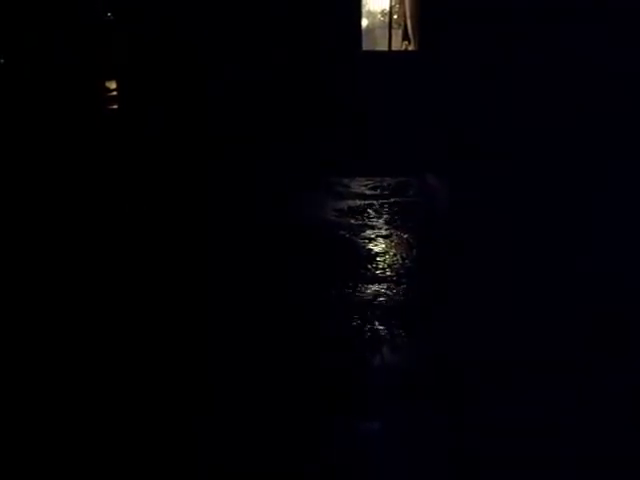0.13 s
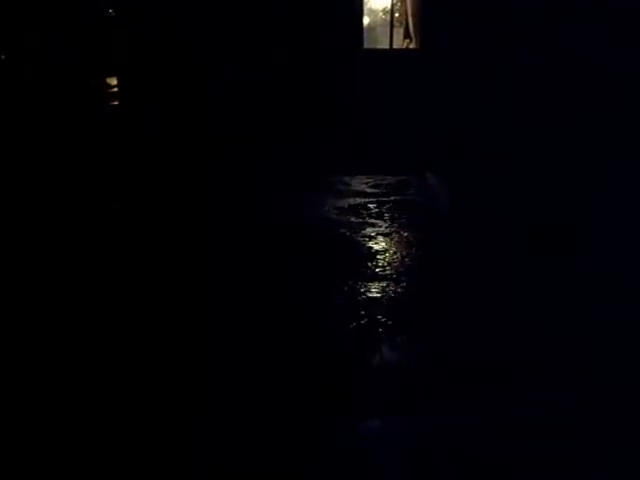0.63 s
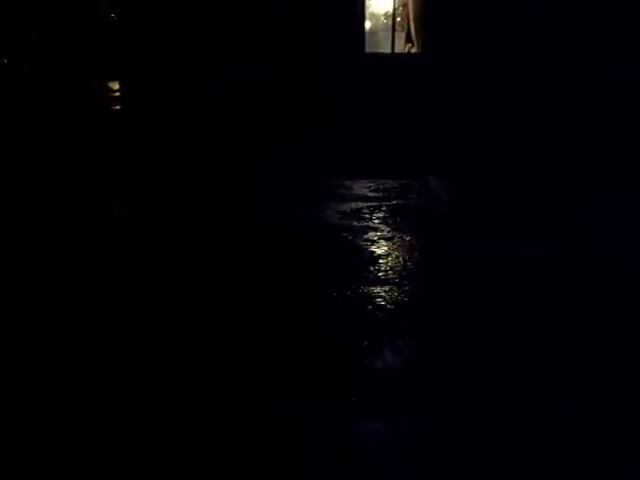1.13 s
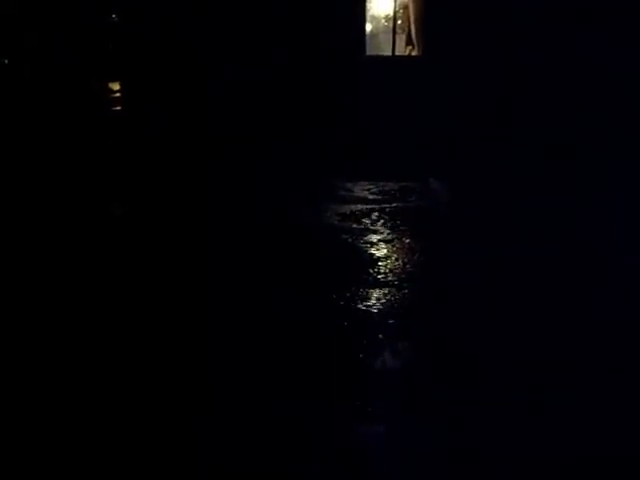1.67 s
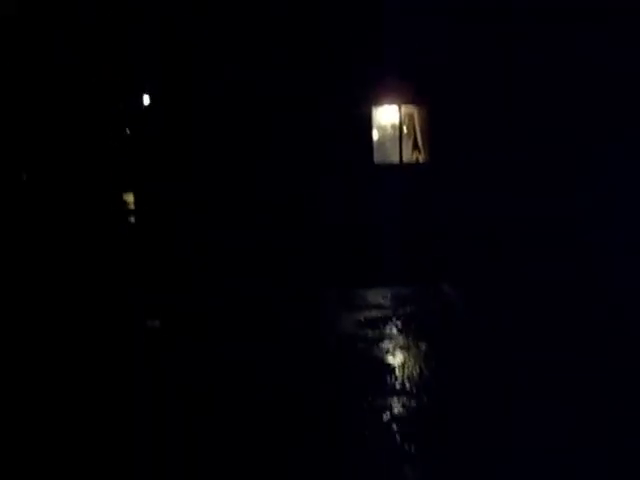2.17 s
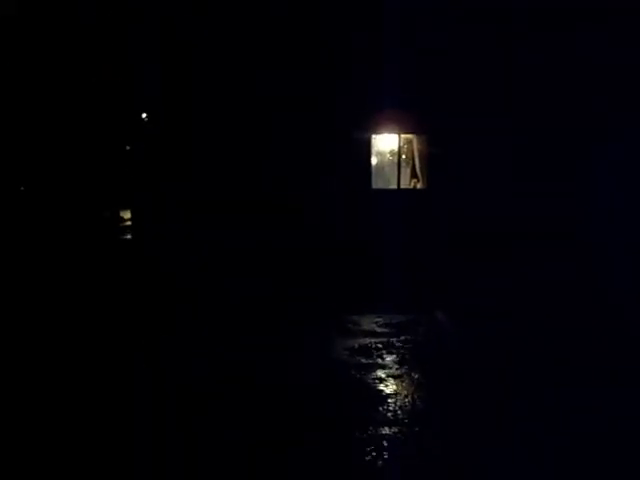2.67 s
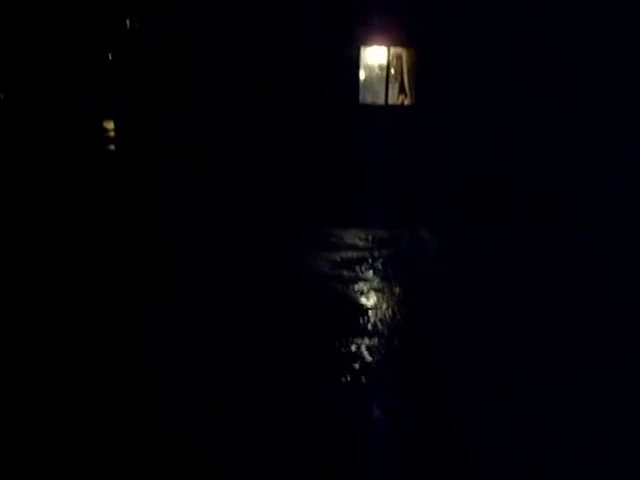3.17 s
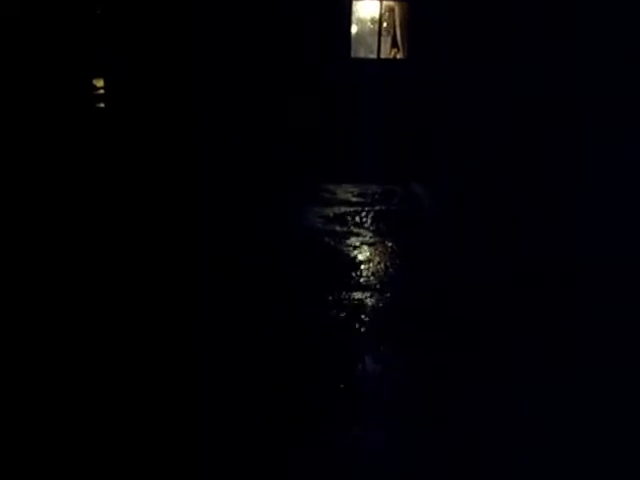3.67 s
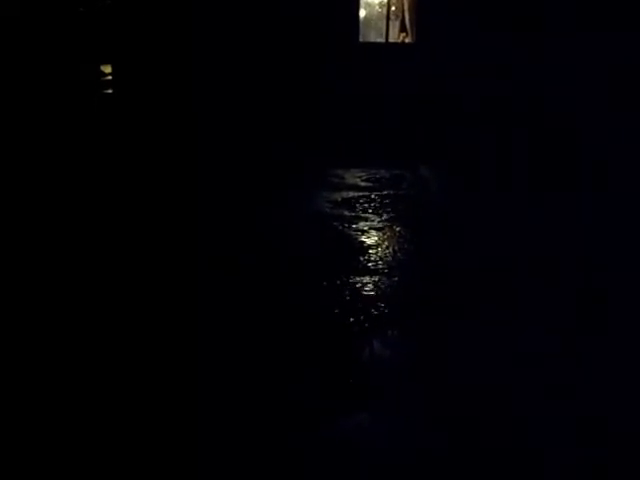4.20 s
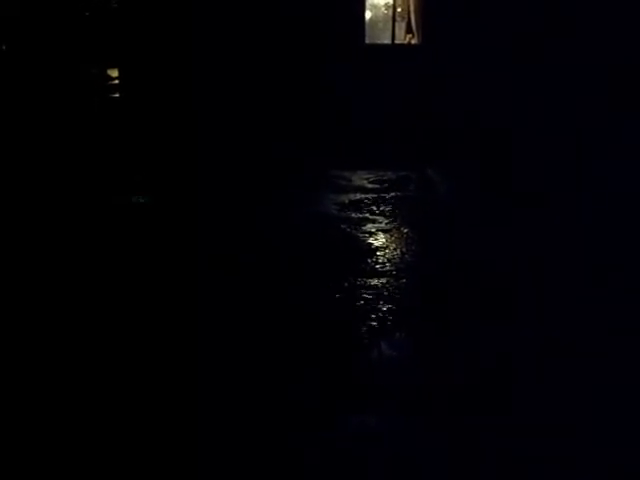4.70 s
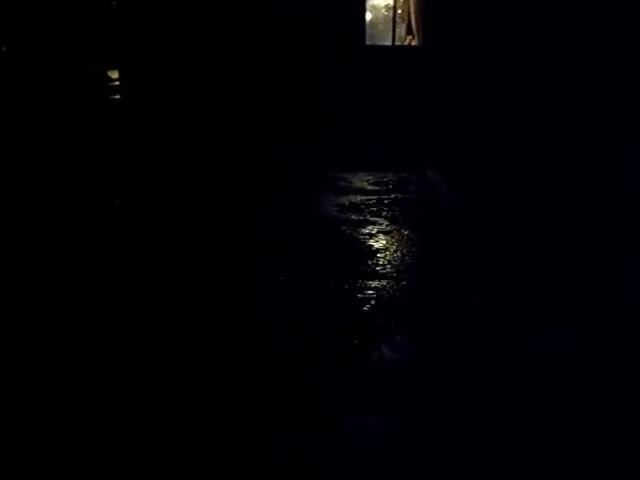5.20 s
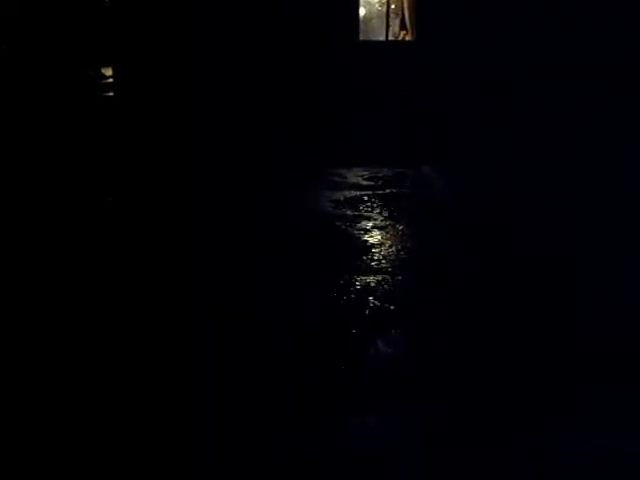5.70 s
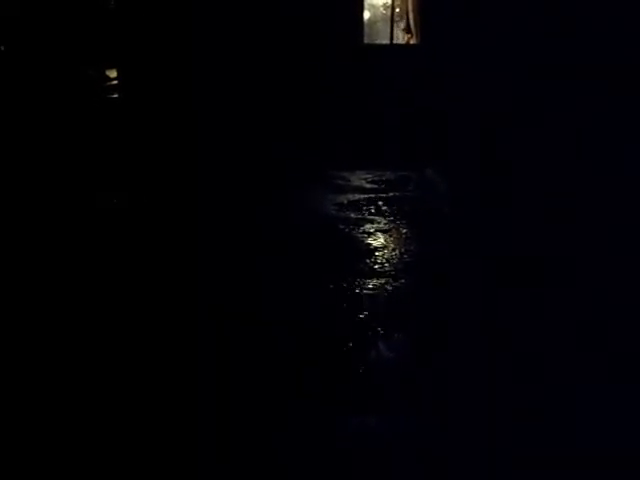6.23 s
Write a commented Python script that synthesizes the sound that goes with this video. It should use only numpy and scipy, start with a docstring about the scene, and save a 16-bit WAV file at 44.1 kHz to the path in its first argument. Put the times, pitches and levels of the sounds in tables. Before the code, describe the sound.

Sparse close raindrops click and spatter irregularly, with nearby walls giving them short reflections. Behind them are finer patter, hushed far rain and a very faint low drone. After almost four seconds of this, thunder arrives, builds in lumps to much louder heavy blows, and rolls on, weakening but not gone at the end. The small microphone sounds thin and hissy, with drops still audible through the thunder.

```python
"""Wet pavement at night in light rain: near ticks and splashes, middle and far drops, a few puddle plinks.
Drops are short damped sine bursts with decaying spatter; the far wash is noise with drifting patches. Thunder
begins just before four seconds: filtered shocks over diffuse noise, swelling in lumps and then fading, with low
blows within it. Far off are a wavering low drone and a thin hum in spells. A small microphone hears it behind a
resonant port; a steady hiss, a thin whine and noise that follows the local level join in."""
import sys
import numpy as np
from scipy import signal
from scipy.fft import rfft, irfft, next_fast_len
from scipy.io import wavfile
from scipy.ndimage import uniform_filter1d

SR = 44100
rng = np.random.default_rng(int(sys.argv[2]) if len(sys.argv) > 2 else 0)


def voltage_ratio(level):
    """Linear amplitude factor for a level in decibels (scalar or array-like)."""
    return 10 ** (np.asarray(level, float) / 20)


def log_audio(samples):
    """Write samples as a 16-bit WAV file to the path given in sys.argv[1]."""
    # one column per channel
    frames = np.atleast_2d(samples).T
    # limit to full scale, then quantise
    limited = np.clip(frames, -1, 1)
    pcm = np.round(limited * 32767).astype(np.int16)
    wavfile.write(sys.argv[1], SR, pcm)


N = 280035  # length in samples


def evened(x):
    """Normalizes mean power: scales to rms 1."""
    return x / np.sqrt(np.mean(x ** 2) + 1e-20)


def read(points, hz):
    """Interpolates a spectrum on a logarithmic frequency axis."""
    point_hz, value = np.transpose(points)
    return np.interp(np.log(hz + 1), np.log(point_hz + 1), value)


def add(mix, s, sound):
    """Superposition: adds a sound into the mix, in place, from time s."""
    part = mix[round(s * SR):][:len(sound)]
    part += sound[:len(part)]


def coloured(x, gain):
    """Linear filtering: multiplies the spectrum by a gain that is a function of frequency."""
    size = next_fast_len(len(x) + 4096)
    return irfft(rfft(x, size) * gain(np.fft.rfftfreq(size, 1 / SR)), size)[:len(x)]


def port(x):
    """Helmholtz resonance: air in the microphone port is a mass on a spring, a peak and then a fall."""
    port_hz, port_q = 3156, 7.5
    return coloured(x, lambda hz: 1 / (1 - (hz / port_hz) ** 2 + 1j * hz / port_hz / port_q))


def tick(hz, cycles):
    """Damped oscillation: a sine burst that swells and dies within some cycles, peak 1 behind the port."""
    turns = np.arange(round(8 * cycles * SR / hz)) * hz / SR
    envelope = (turns / cycles) ** 1.5 * np.exp(-2 * turns / cycles)
    burst = np.sin(2 * np.pi * turns) * envelope
    tail = np.exp(-turns)
    burst -= burst.sum() * tail / tail.sum()  # an impact leaves no lasting pressure
    return burst / abs(port(burst)).max()


def train(per_s, spread_db):
    """Poisson-like shot noise: random clicks of either sign, a few much larger."""
    hit, size, sign = rng.random(N), rng.exponential(1, N), rng.choice([-1., 1.], N)
    return (hit < per_s / SR) * sign * voltage_ratio(spread_db * np.minimum(size, 3.3))


def echoed(x):
    """Early reflection: nearby walls repeat a sound within milliseconds, with the treble dulled."""
    # first reflections from the walls: delay_s, level_db
    walls = [(.0038, -8), (.0078, -11), (.0125, -15), (.021, -18)]
    out = x.copy()
    dull = coloured(x, lambda hz: 1 / (1 + (hz / 5000) ** 4))
    for delay_s, level_db in walls:
        add(out, delay_s, voltage_ratio(level_db) * dull)
    return out


def drops():
    """Impact and spray: each near drop is a tick with a sharp edge and a thud, then a spatter of droplets."""
    # near drops: peak_s, peak_db (of the part that suits the tone, behind the port),
    # tone (-1 dull thud, 0 tick, 1 sharp edge; clipped there), spatter_db (rms before rise and decay)
    near_drops = [(0.0224, -48, 1.1, -65), (0.2096, -47, -0.7, -54.5), (0.234, -42, 0.87, -56),
                  (0.29, -37.5, 0.54, -53), (0.337, -47, .05, -58), (0.4505, -50, .05, -67),
                  (0.5101, -36, -0.72, -52.5), (0.597, -47, .05, -65), (0.7394, -47, .1, -63),
                  (0.885, -37, 0.58, -54), (0.914, -39, .05, -63), (0.975, -47, -0.77, -58.5),
                  (1.0486, -51, -.4, -67), (1.0825, -54, 0.95, -70), (1.268, -52, .6, -61),
                  (1.341, -51, -1, -59), (1.3984, -48, 1.0, -59), (1.403, -49, 1.2, -68),
                  (1.435, -48, .5, -64), (1.5058, -34, 0.5, -50), (1.5306, -46, -.3, -70),
                  (1.569, -53, .6, -58), (1.606, -51, .4, -75), (1.636, -41, -0.77, -60),
                  (1.6755, -46, -0.76, -69), (1.9608, -37.5, .1, -58), (2.0044, -55, 0.52, -75),
                  (2.0617, -42.5, 1.2, -69), (2.0846, -51, .4, -66), (2.1477, -40.5, .05, -50.5),
                  (2.2094, -50, .1, -60), (2.2245, -46.5, .1, -68), (2.307, -48, -0.67, -73),
                  (2.442, -41, 0.77, -51.5), (2.543, -47, .8, -58), (2.566, -46, .2, -54.5),
                  (2.6706, -57, 0.77, -75), (2.817, -31, .65, -47), (2.9285, -50, .1, -55.5),
                  (3.0117, -54, .05, -69), (3.114, -50, .05, -70), (3.248, -40.5, 0.94, -61),
                  (3.2666, -38.5, .05, -68), (3.3347, -45, .2, -61), (3.353, -52, 1, -66),
                  (3.382, -51, .5, -65), (3.4097, -42, -0.57, -56), (3.439, -49, .95, -72),
                  (3.4628, -45, -0.78, -59), (3.4795, -48, .05, -72), (3.5634, -45, -0.57, -53),
                  (3.7407, -46, -0.31, -62), (3.901, -52, 1, -75), (3.9369, -48, -.5, -73),
                  (4.133, -42, .05, -54), (4.1922, -42.5, -.3, -57), (4.383, -42, .05, -72),
                  (4.5054, -50, .1, -56), (4.588, -44, .5, -53), (4.8016, -29, 0.49, -47.5),
                  (4.8656, -41, .1, -52), (5.3147, -44, 0.14, -66), (5.4567, -45, 0.86, -53.5),
                  (5.518, -42.5, .05, -62), (5.5563, -46, .95, -58), (5.845, -52, .3, -54),
                  (5.9538, -41, 0.51, -53), (6.015, -45, .05, -57), (6.09, -45, -0.51, -74)]
    # how far each part sinks when the tone is not its own
    tick_loss_db, edge_loss_db, thud_loss_db = 13, 22, 18
    spatter_rise_s, spatter_t60_s = 0.0023, .065
    out, t = np.zeros(N), np.arange(3500) / SR
    detune = rng.uniform(.9, 1.1, (len(near_drops), 3))
    droplets = rng.standard_normal((len(near_drops), len(t)))
    droplets = droplets * abs(droplets)  # uneven sizes
    spatter_shape = voltage_ratio(-60 * t / spatter_t60_s) * np.minimum(t / spatter_rise_s, 1)
    for (peak_s, peak_db, tone, spatter_db), (a, b, c), spray in zip(near_drops, detune, droplets):
        body = tick(3500 * a, 1.0)
        spatter = np.convolve(spray, body)[:len(t)]
        drop = voltage_ratio(spatter_db) * spatter_shape * spatter / port(spatter).std()
        sharp, dull = np.clip(tone, 0, 1), np.clip(-tone, 0, 1)
        add(drop, 0, voltage_ratio(peak_db - tick_loss_db * (sharp + dull) ** 4) * body)
        add(drop, .0002, voltage_ratio(peak_db - edge_loss_db * (1 - sharp)) * tick(6600 * b, .9))
        add(drop, 0, voltage_ratio(peak_db - thud_loss_db * (1 - dull)) * tick(1800 * c, 1.0))
        add(out, peak_s - .0005, drop)
    return echoed(out)


def thunder():
    """Extended source: shocks from each kink of the lightning channel arrive scattered over diffuse echoes."""
    # loudness of the roll before its deep end and treble are weighted: time_s, level_db
    roll_levels = [(3.92, -56), (3.94, -54.5), (3.99, -56), (4.09, -48), (4.12, -52.5), (4.23, -41),
                   (4.37, -44), (4.52, -42), (4.61, -37.5), (4.66, -32.5), (4.7, -37.5), (5.17, -35),
                   (5.21, -38), (5.32, -39.5), (5.37, -42), (5.5, -42), (5.53, -36.5), (5.61, -42),
                   (5.75, -43.5), (5.78, -41), (5.86, -45.5), (5.94, -41), (6.35, -46)]
    # relative spectrum of the thunder in the air: freq_hz, density_db
    air_colour = [(20, -8), (50, -15), (90, -2), (140, 1), (220, 0.5), (450, -1), (900, -6), (1300, -11.5),
                  (1800, -21), (2600, -34.5), (3400, -52), (4500, -62.5), (7000, -58)]
    front_s = 3.921
    boom_start_db, boom_drift_db_per_s = -5, 1.2
    # later sound comes from farther up the channel and has lost more treble
    crackle_start_db, crackle_drift_db_per_s, crackle_least_db = 11, -6, 0
    # the first arrivals graze the ground and lack the top of the crackle
    muffled_db, muffled_hz, opening_s = -12, 1750, .24
    since = np.arange(N) / SR - front_s
    level_db = np.interp(since + front_s, *np.transpose(roll_levels))
    boom_db = boom_start_db + boom_drift_db_per_s * since
    crackle_db = np.maximum(crackle_start_db + crackle_drift_db_per_s * since, crackle_least_db)
    muffle_db = muffled_db * np.clip(1 - (since / opening_s) ** 4, 0, 1)

    echoes = np.clip(0.71 + 0.81 * since, 0, 2.2)  # the diffuse echoes build up after the first arrivals
    shocks = evened(train(per_s=1200, spread_db=3.5)) + echoes * rng.standard_normal(N)
    shocks = shocks / np.sqrt(1 + echoes ** 2)
    # kinks come in clumps
    lumps = evened(coloured(rng.standard_normal(N), lambda hz: 1 / (1 + (hz / 30) ** 2)))
    air = evened(coloured(shocks * voltage_ratio(1.1 * lumps), lambda hz: voltage_ratio(read(air_colour, hz))))

    boom = coloured(air, lambda hz: 1 / (1 + (hz / 170) ** 4))
    crackle = coloured(air, lambda hz: 1 - 1 / (1 + (hz / 1400) ** 4))
    roll = air + (voltage_ratio(boom_db) - 1) * boom + (voltage_ratio(crackle_db) - 1) * crackle
    top = coloured(roll, lambda hz: 1 - 1 / (1 + (hz / muffled_hz) ** 8))
    roll = roll + (voltage_ratio(muffle_db) - 1) * top
    return voltage_ratio(level_db) * roll * np.clip(since / 0.0098, 0, 1)  # the first front arrives abruptly


def thumps():
    """Coincident arrival: a long straight stretch of the channel is heard at once as a low, brief blow."""
    # heavy blows within the thunder: time_s, peak_db (behind the port), pitch_hz
    blows = [(4.53, -45, 85), (4.601, -48, 81.5), (4.647, -30.5, 230), (4.651, -31, 380), (4.744, -38, 236),
             (4.789, -45.5, 72), (4.919, -30, 314), (5.007, -32, 448), (5.042, -27.5, 355),
             (5.094, -33, 162), (5.464, -44, 198), (5.522, -33, 379), (5.764, -40.5, 170),
             (5.931, -36.5, 395), (6.02, -44, 219), (6.145, -47, 170)]
    out = np.zeros(N)
    for time_s, peak_db, pitch_hz in blows:
        add(out, time_s - .003, voltage_ratio(peak_db) * tick(pitch_hz, 2.53))
    return out


def plinks():
    """Bubble resonance: air trapped in a puddle swells into a short note that rises a little."""
    # bubbles: peak_s, peak_db (ahead of the port), pitch_hz (middle of the rise), length_s
    bubbles = [(1.357, -57.5, 1230, 0.023), (1.541, -62, 1430, 0.022), (2.594, -61, 1190, 0.017),
               (3.333, -63, 1440, 0.009), (3.522, -61, 1190, 0.029), (3.874, -63, 1120, 0.027)]
    out = np.zeros(N)
    for peak_s, peak_db, pitch_hz, length_s in bubbles:
        t = np.arange(0, length_s, 1 / SR)
        bent_t = t + .015 * t * (t / length_s - 1)  # from 1.5 % below the pitch to 1.5 % above
        envelope = np.sin(np.pi * (t / length_s) ** 0.45)
        add(out, peak_s - .004, voltage_ratio(peak_db) * np.sin(2 * np.pi * pitch_hz * bent_t) * envelope)
    return out


def patter():
    """Shot noise through resonances: drops at middle distance, as random ticks at ten pitches."""
    pitches = np.geomspace(1500, 6500, 10)
    gains = voltage_ratio(-4 * abs(np.log2(pitches / 3000)))  # most ticks are heard near the port's ring
    ticks = np.zeros(N)
    for hz, gain in zip(pitches, gains):
        ticks += gain * signal.oaconvolve(train(per_s=45, spread_db=8), tick(hz, 0.47))[:N]
    return voltage_ratio(-74) * evened(echoed(ticks))


def wash():
    """Incoherent summation: countless far drops are noise with drifting patches and a shared flicker."""
    # relative spectrum of far rain and night air: freq_hz, density_db
    wash_colour = [(20, -19), (60, 3.5), (200, 0), (340, -1), (700, 1), (1500, -1.5), (2400, -4),
                   (3200, -6), (4400, -8.5), (6500, -10), (12000, -42)]
    frames = N // 128 + 5
    patches = uniform_filter1d(rng.standard_normal((frames, 257)), 20, 0)  # smooth in time
    patches = evened(uniform_filter1d(patches, 6, 1))  # and in frequency
    flicker = evened(uniform_filter1d(rng.standard_normal(frames), 6))[:, None]  # the same in all bands
    noise = coloured(rng.standard_normal(frames * 128), lambda hz: voltage_ratio(read(wash_colour, hz)))
    z = signal.stft(noise, nperseg=512, noverlap=384)[2]
    z = z[:, :frames] * voltage_ratio(0.75 * patches + 0.39 * flicker).T
    noise = signal.istft(z, nperseg=512, noverlap=384)[1][:N]
    return voltage_ratio(-69.5) * evened(noise)


def drone():
    """Frequency modulation and narrow-band noise: a wavering low note among a few noise bands."""
    # bands: centre_hz, width_hz (between half-amplitude points), level_db (rms before drift), drift_db_per_s
    drone_bands = [(94, 63, -84, 2), (146.4, 20, -81, -4), (263, 29, -88.5, .1), (33.2, 25, -86, 0.5)]
    waver = evened(coloured(rng.standard_normal(N), lambda f: 1 / (1 + (f / 3) ** 2)))
    turns = np.cumsum(76.3 + 3.6 * waver) / SR  # pitch in Hz
    out = voltage_ratio(-80 + 1.6 * waver[::-1]) * np.sqrt(2) * np.sin(2 * np.pi * turns)
    for centre_hz, width_hz, level_db, drift_db_per_s in drone_bands:
        noise = rng.standard_normal(N)
        band = evened(coloured(noise, lambda f: 1 / (1 + (2 * (f - centre_hz) / width_hz) ** 2)))
        out += voltage_ratio(level_db + drift_db_per_s * np.arange(N) / SR) * band
    return out


def hum():
    """Frequency modulation: a thin distant tone wavers in pitch and comes in spells."""
    # spells: start_s, length_s, pitch_hz (mean), level_db (rms between the fades, ahead of the port)
    spells = [(.85, .7, 880, -85.5), (2.55, 0.56, 879, -80.5), (3.08, 0.56, 850, -85)]
    fade_s = 0.054
    out = np.zeros(N)
    waver = evened(coloured(rng.standard_normal(N), lambda f: 1 / (1 + (f / 8) ** 2)))
    for start_s, length_s, pitch_hz, level_db in spells:
        t = np.arange(0, length_s, 1 / SR)
        fade = np.clip(np.minimum(t, length_s - t) / fade_s, 0, 1)
        turns = np.cumsum(pitch_hz + 6.0 * waver[round(start_s * SR):][:len(t)]) / SR
        add(out, start_s, np.sqrt(2) * voltage_ratio(level_db) * fade * np.sin(2 * np.pi * turns))
    return out


def scene():
    """Superposition: rain in its layers, the thunder and the far tones add up to one channel."""
    rain = drops() + plinks() + patter() + wash()
    storm = thunder() + thumps()
    return (rain + storm + drone() + hum())[None]


def band_limit(x):
    """A steep low-pass at the top of the band."""
    return signal.sosfilt(signal.butter(12, 12270, fs=SR, output="sos"), x)


def record(dry):
    """The port rings; a steady hiss, noise that follows the local level and a whine join in."""
    # relative spectrum shared by the hiss and the level-following noise: freq_hz, density_db
    noise_colour = [(300, -17), (3000, -4), (7500, -4.5), (10400, -7), (12100, -19), (13000, -37)]
    heard = port(dry[0])
    local_rms = np.sqrt(abs(uniform_filter1d(heard ** 2, 120)))
    noise_gain = np.hypot(voltage_ratio(-79.5), voltage_ratio(-37) * local_rms)  # steady part and following part, by power
    noise = coloured(noise_gain * rng.standard_normal(N), lambda hz: voltage_ratio(read(noise_colour, hz)))
    noise = evened(noise) * np.sqrt(np.mean(noise_gain ** 2))
    whine = voltage_ratio(-88.0) * np.sin(2 * np.pi * 7989 * np.arange(N) / SR)
    return band_limit((heard + noise + whine)[None])


dry = scene()
out = record(dry)
log_audio(out)
```